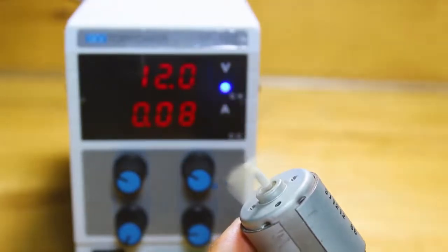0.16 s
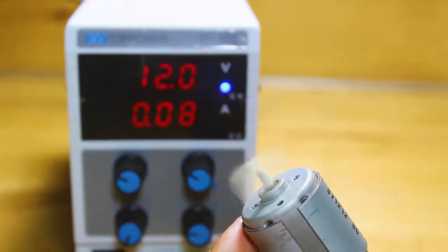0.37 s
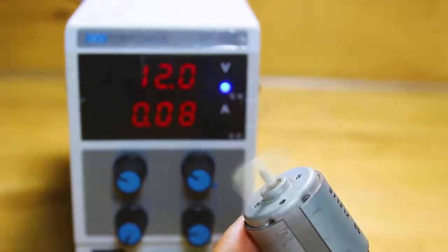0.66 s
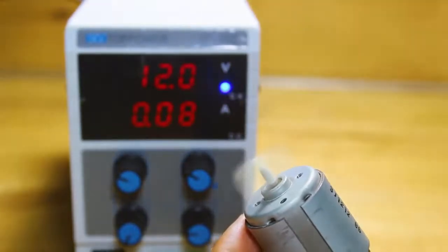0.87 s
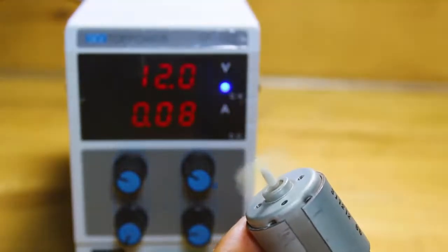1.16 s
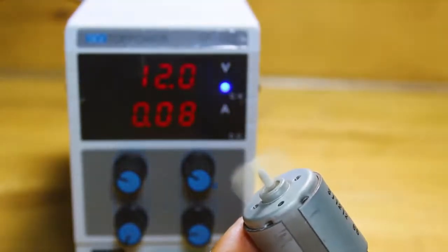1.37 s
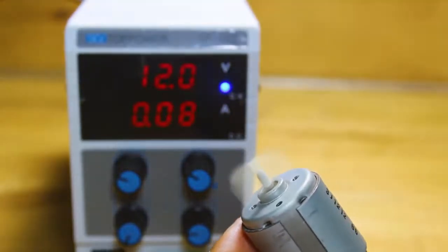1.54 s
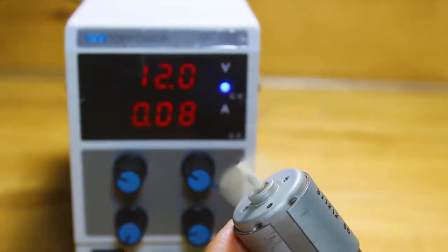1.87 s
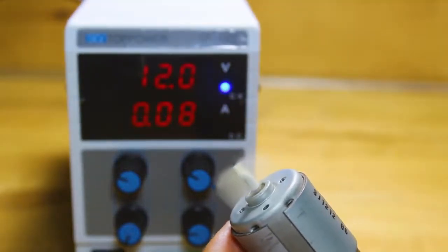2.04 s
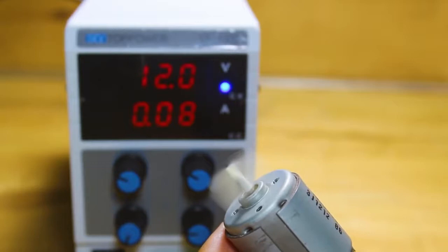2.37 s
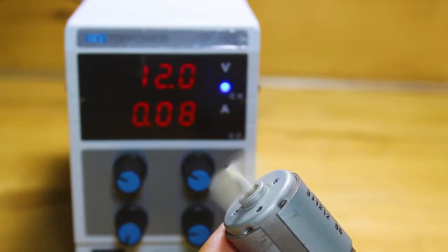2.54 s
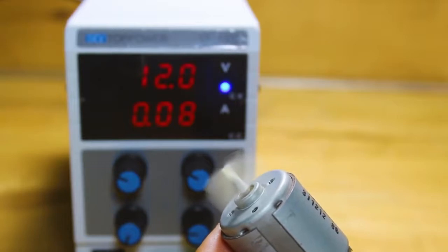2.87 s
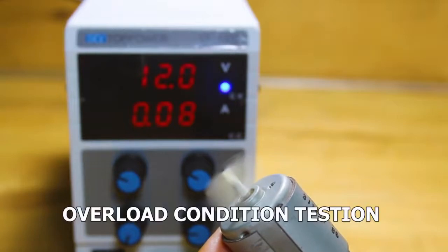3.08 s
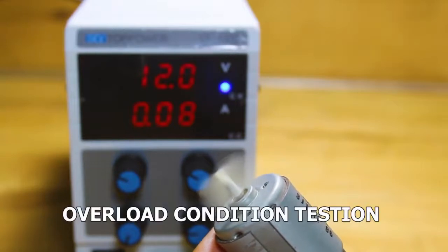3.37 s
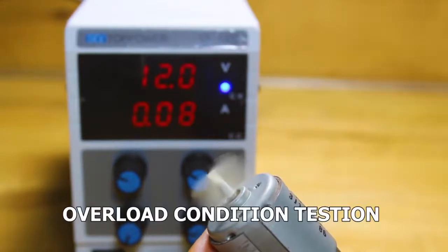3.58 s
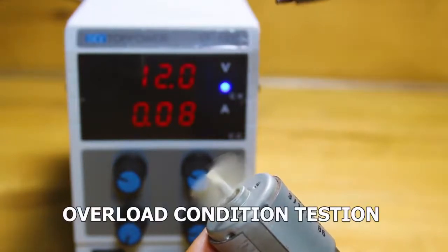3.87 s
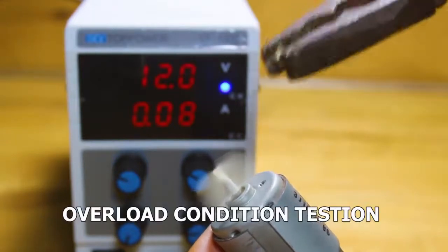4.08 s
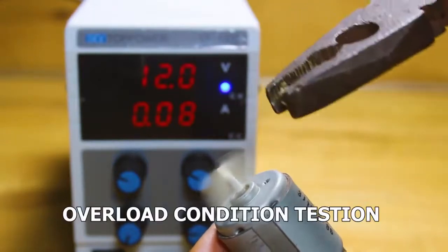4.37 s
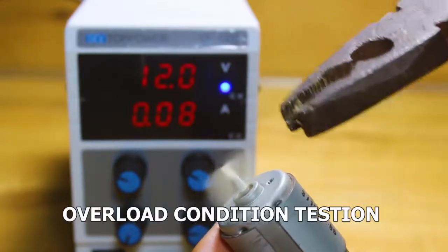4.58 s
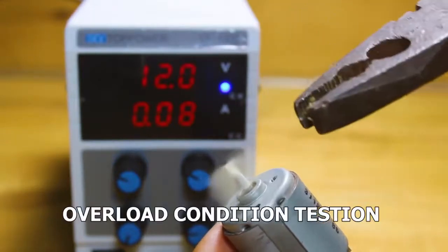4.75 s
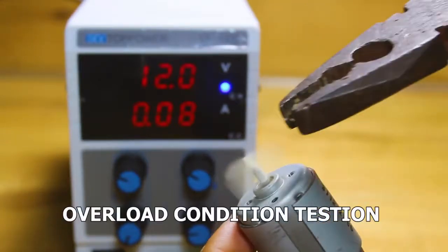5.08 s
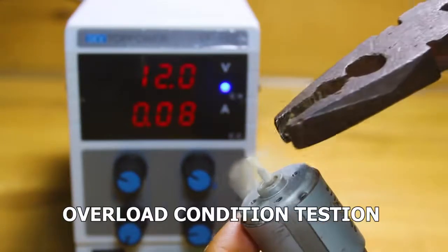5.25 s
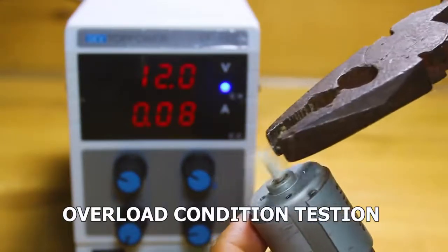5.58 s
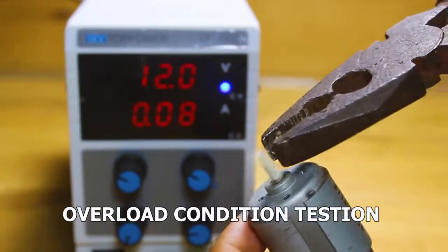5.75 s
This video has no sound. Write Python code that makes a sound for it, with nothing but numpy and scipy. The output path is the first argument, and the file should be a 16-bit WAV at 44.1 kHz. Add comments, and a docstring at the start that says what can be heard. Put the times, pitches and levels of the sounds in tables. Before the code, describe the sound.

Close stereo sound of a tiny motor running at constant speed beside a faintly humming bench supply in a quiet indoor spot. The low hum leans left, with thin, bright brush hiss on top. At about three seconds the level jumps up. In the last half second the strip puffs air and flutters rapidly against pliers, droning roughly while the motor slows very slightly.

```python
"""From the start a hand-held brushed motor spins a paper strip at a steady 67 turns/s, beside a humming bench supply.
The rotor hums, the strip stirs the air; brushes scrape one track every turn and make the steel can sizzle.
At 3 s the whole sound steps up abruptly; the rotor gains a shade of speed and the buzz dips briefly.
At 5.4 s pliers touch the strip: it puffs air, slaps them once a turn, flutters and drones, and slows the rotor."""
import sys
import numpy as np
from scipy import signal
from scipy.fft import rfft, irfft
from scipy.io import wavfile

SR = 44100
rng = np.random.default_rng(int(sys.argv[2]) if len(sys.argv) > 2 else 0)


def dump_mix(stems):
    """Bounce the given channels to the path in sys.argv[1] as a 16-bit WAV at rate SR."""
    frames = np.atleast_2d(stems).T  # one column per channel
    limited = np.clip(frames, -1, 1)  # hard clip at full scale
    pcm = np.round(limited * 32767).astype(np.int16)
    wavfile.write(sys.argv[1], SR, pcm)


N = 261072
TIME_S = np.arange(N) / SR

# Stereo image: (frequency [Hz], left-right likeness [-1..1])
LIKENESS = [(60, .1), (300, .15), (380, .05), (520, .65), (830, .65), (1080, .97), (1500, 1), (5400, 1),
            (6100, .3), (6800, .6), (9500, .35), (11200, .8), (15000, .8)]
# Stereo image: (frequency [Hz], phase by which the left leads [rad])
LEFT_LEAD = [(5600, 0), (6120, -1.5), (6630, 0), (7400, 0), (7840, -.9), (8270, -1), (8550, .6), (8900, .8),
             (9400, 2.8), (10200, 3), (10600, 1.9), (11500, 2.1), (11900, 1.3), (12700, .9), (13400, 2.8),
             (15200, 3.1)]
# Air stirred by the strip: (frequency [Hz], density [dB per Hz], left minus right [dB])
AIR_SPECTRUM = [(25, -78, -1.0), (50, -73.5, -2), (100, -74, 1), (177, -74.5, -3), (222, -76.5, -1.0),
                (300, -70, -1), (393, -73.5, -2), (520, -69, -4), (652, -75, -4.5), (790, -82.5, -12),
                (1370, -100, -0.5)]
# Bench supply's mains hum and fan: (frequency [Hz], level [dB], left minus right [dB])
SUPPLY_TONES = [(99.8, -63, 2), (184.6, -59, 0)]
# Where the brushes bite within a turn: (angle [turns], width [turns], bump over the smooth track [dB])
CONTACTS = [(.06, 0.024, -0.5), (.17, 0.012, -2), (.3, .022, -4.5), (.36, .018, -4.5), (0.534, .022, -0.5),
            (0.596, 0.023, -8), (.69, 0.016, -10), (.87, 0.032, -11)]
# Multiples of rotor speed that stand out, before gains: (multiple, level [dB], left minus right [dB])
STRONG_ORDERS = [(2, -60.0, -10.0), (5, -54.0, 7.0), (6, -58, 4), (10, -55, 1), (11, -60, -14),
                 (15, -49, 0), (16, -52, 0), (17, -51, 0), (18, -57, 0), (21, -57, 0), (24, -59, 0),
                 (27, -61, 0), (28, -46.5, 0), (29, -57, 0), (32, -61, 0), (33, -61, 0), (37, -65, 0),
                 (41, -65, 0), (51, -56, 0), (52, -57, 0), (56, -54, 0), (57, -52, 0), (58, -49, 0),
                 (59, -50, 0), (60, -52, 0), (63, -51, 0), (66, -53, 0), (71, -52, 0), (72, -53, 0),
                 (73, -51, 0), (74, -48, 0), (77, -52, 0), (79, -53, 0), (81, -49, 0), (86, -53, 0),
                 (89, -53, 0), (91, -48, -8), (95, -56, 6), (101, -52, 1), (112, -48, -5), (114, -48, -4),
                 (117, -42, -12), (118, -38, -9), (120, -40, -4), (121, -41, -14), (126, -39, -6),
                 (131, -40, 0), (149, -49, 0), (157, -41, 0), (161, -38, 8), (163, -40, 3), (167, -37, 1),
                 (176, -38, 1), (177, -38, -2), (184, -32, -4), (187, -35, -4), (193, -35, -3),
                 (194, -33, -8)]
# All other multiples, before scatter and gains: (frequency [Hz], level [dB], left minus right [dB])
BUZZ_SPECTRUM = [(200, -64.0, 3.0), (850, -66.0, 1.0), (1250, -62.5, 0.0), (2150, -66.0, 0.0),
                 (2400, -73.0, 0.0), (2850, -71.5, 0.0), (3150, -79.0, 0.0), (3800, -58.5, 0.0),
                 (5200, -56.5, 0.0), (6400, -61.5, 0.0), (8200, -48.0, -4.0), (10000, -54.0, -1.0),
                 (11100, -42.0, 4.0), (11500, -47.0, 1.0), (12000, -41.0, -2.0), (12700, -39.0, -6.0),
                 (14200, -58.0, -1.0), (15500, -56.0, 4.0)]
# Brush friction through the can, before gains: (frequency [Hz], density [dB per Hz], left minus right [dB])
HISS_SPECTRUM = [(800, -75.5, -7.5), (1630, -76, 0), (2090, -79, 0), (2400, -83, 0), (3160, -84, 0),
                 (3800, -75.5, 1.5), (5200, -74, -1), (6280, -74, -5.5), (8730, -67, 2), (9240, -71.5, -8),
                 (10100, -66.5, -3), (10900, -58.5, 3), (11700, -66, 2), (12770, -58, -2),
                 (13700, -67.5, -6), (15500, -69, -2)]
# Modes of the can, rung by sparks: (frequency [Hz], t60 [s], relative level [dB], left minus right [dB])
CAN_MODES = [(3890, .013, -4.5, -3), (8160, 0.0028, -9, -4), (10900, 0.0084, 3, 5), (12200, .005, -8, -9),
             (12600, .006, -2, -6)]
# How hard the brushes rub: (time [s], gain [dB])
RUB_GAIN = [(0, -1.5), (1.9, -1.35), (2.9, -1), (3.5, -0.4), (4.6, -0.5), (5.55, -2), (5.69, -3.5),
            (5.92, -2)]
# Runs of slaps, one a turn: (first slap [s], end of run [s], rate [slaps per s])
SLAP_RUNS = [(5.4238, 5.58, 66.95), (5.5882, 5.716, 66.2), (5.7327, 5.919, 66.8)]
# How hard the strip meets the pliers, before scatter: (time [s], level [dB])
SLAP_FORCE = [(5.425, -35), (5.439, -28), (5.454, -22.5), (5.469, -29), (5.483, -20.5), (5.56, -20.5),
              (5.625, -19), (5.66, -22), (5.7, -25.5), (5.73, -24.5), (5.81, -25), (5.853, -26.5),
              (5.868, -23.5), (5.898, -22), (5.913, -17.5)]
# Strip springs back and hits the pliers a second time: (time [s], level [dB])
REBOUNDS = [(5.4718, -23), (5.5021, -23), (5.7175, -27)]
# Resonance of the strip's free end, higher as the pliers shorten it: (time [s], frequency [Hz])
SLAP_PITCH = [(5.44, 1496), (5.52, 1705), (5.62, 1970), (5.68, 2803), (5.84, 3210), (5.92, 2620)]
# Strip's drone under load, before its gain: (multiple of rotor speed, level [dB])
DRONE_ORDERS = [(5, -56), (6, -55), (7, -51), (10, -55), (12, -55), (13, -55), (15, -51), (16, -53),
                (17, -54), (19, -51), (23, -51)]

CUTOFF_HZ = 15720
# everything is softer until the step
STEP_S, STEP_DB = 2.991, -9
# pliers arrive; load comes on
TOUCH_S, LOAD_RISE_S = 5.43, 0.14
# rotor: speed, gain after the step and its time constant, loss under load and its duration
TURNS_PER_S = 67.28
SPEED_GAIN_TURNS_PER_S, SPEED_GAIN_S = .085, .35
SPEED_LOSS_TURNS_PER_S, SPEED_LOSS_S = .92, .31
# unsteady hand: rate, sway of hum and of brushes
SWAY_HZ, SWAY_HUM_DB, SWAY_RUB_DB = 1.9, 0.5, 0.19
HUM_DB, LOAD_HUM_DB, HUM_BEFORE_DB = -36.3, -6.5, 1.7
AIR_BEFORE_DB, AIR_AFTER_DB, LOAD_AIR_DB = 1, -.5, -0.5
# puff as the strip first folds against the pliers: gain and time to peak
PUFF_DB, PUFF_S = 4, .06
# brushes: free-running gains, and what full load adds
BUZZ_DB, HISS_DB, LOAD_BUZZ_DB, LOAD_HISS_DB = 0.96, -0.07, -2, 4
# buzz dip after the step: depth and time to the lowest point
BUZZ_DIP_DB, BUZZ_DIP_S = -1.0, .28
# gain of neighbouring commutator tracks relative to the main one
WANDER_FREE, WANDER_LOADED = 0.32, 1.33
# lopsided strip presses the brushes harder once a turn
THROB_DB, THROB_ANGLE_TURNS = .5, .17
# paper bends differently each time
SLAP_SCATTER_DB, SLAP_JITTER_S = 1.2, .00004
# swing of the paper and sharp crack, relative to the slap
SNAP_DB, CRACK_DB = 7, 5
# power share of the flutter that is the same after every slap
FLUTTER_REPEATS = .6
ECHO_S, ECHO_DB = .0035, -10
DRONE_DB = -5.5


def from_db(db):
    """Decibels to gain."""
    return 10 ** (np.asarray(db) / 20)


def rms_one(x):
    """Scale to unit rms."""
    return x / np.sqrt(np.mean(x ** 2) + 1e-20)


def in_time(rows):
    """Columns of a curve, sample by sample."""
    time_s, *columns = np.transpose(rows)
    return np.array([np.interp(TIME_S, time_s, column) for column in columns])


def at_hz(rows, hz):
    """Columns of a spectrum, read on a log-frequency axis."""
    points_hz, *columns = np.transpose(rows)
    log_hz = np.log(hz + 1e-9)
    return np.array([np.interp(log_hz, np.log(points_hz), column) for column in columns])


def drift(rate_hz):
    """Low-passed noise with unit rms: smooth chance."""
    hz = np.fft.rfftfreq(N, 1 / SR)
    spectrum = rfft(rng.standard_normal(N)) / (1 + (hz / rate_hz) ** 4)
    return rms_one(irfft(spectrum, N))


def swell(start_s, peak_s):
    """Rises from 0 at the start to 1 after peak_s, then dies away."""
    age = np.maximum(TIME_S - start_s, 0) / peak_s
    return (age * np.exp(1 - age)) ** 2


def panned(db, pan_db):
    """Left and right gains with rms level db."""
    sides = from_db(np.multiply.outer([.5, -.5], np.atleast_1d(pan_db)))
    return from_db(db) * sides / np.sqrt(np.mean(sides ** 2, axis=0))


def two_sides(mid, side, hz):
    """Two unrelated spectra become a partly alike left and right."""
    alike = np.clip(at_hz(LIKENESS, hz), -1, 1)
    sign = np.array([[1], [-1]])
    pair = np.sqrt((1 + alike) / 2) * mid + np.sqrt((1 - alike) / 2) * side * sign
    return pair * np.exp(.5j * sign * at_hz(LEFT_LEAD, hz))


def stereo_noise(spectrum, gate, low_hz):
    """Gated noise coloured by a spectrum in dB per Hz, with a steep low edge."""
    hz = np.fft.rfftfreq(N, 1 / SR)
    mid, side = rfft(rng.standard_normal((2, N)) * gate)
    low_edge = hz ** 4 / (hz ** 4 + low_hz ** 4)
    colour = low_edge * panned(*at_hz(spectrum, hz))
    return irfft(two_sides(mid, side, hz) * colour, N) * np.sqrt(SR / 2)


def rotor_turns(wander):
    """Rotor angle in turns: steady, a shade faster after the step, sagging and faltering under load."""
    gained = SPEED_GAIN_TURNS_PER_S * (1 - np.exp(-np.maximum(TIME_S - STEP_S, 0) / SPEED_GAIN_S))
    lost = SPEED_LOSS_TURNS_PER_S * np.clip((TIME_S - TOUCH_S) / SPEED_LOSS_S, 0, 1)
    falter = 0.019 * wander ** 2 * drift(15.0)
    return np.cumsum(TURNS_PER_S + gained - lost + falter) / SR


def rotor_hum(swing, sway, load, before_step):
    """The strip's once-a-turn pressure wave, a sine reaching mainly the left side."""
    level_db = HUM_DB + LOAD_HUM_DB * load + HUM_BEFORE_DB * before_step + SWAY_HUM_DB * sway
    return from_db(level_db) * panned(db=-3.5, pan_db=23.0) * swing


def stirred_air(swing, load, before_step):
    """Turbulence off the strip: low noise pulsing once a turn, with a puff at first touch."""
    level_db = np.where(before_step, AIR_BEFORE_DB, AIR_AFTER_DB) + LOAD_AIR_DB * load
    level_db = level_db + PUFF_DB * swell(TOUCH_S, PUFF_S)
    return from_db(level_db) * stereo_noise(AIR_SPECTRUM, 1 + 0.12 * swing, low_hz=15)


def supply_tones():
    """The bench supply's mains hum and fan as steady sines."""
    return sum(panned(db, pan_db) * np.sqrt(2) * np.sin(2 * np.pi * hz * TIME_S)
               for hz, db, pan_db in SUPPLY_TONES)


def brush_force(angle_turns):
    """Friction over one turn: a smooth track with a bump at each contact."""
    force = 1
    for centre, width, db in CONTACTS:
        away = (angle_turns - centre + .5) % 1 - .5
        force = force + from_db(db) * np.exp(-.5 * (away / width) ** 2)
    return rms_one(force)


def one_turn(scatter_db, low_hz, size=8192, count=233):
    """The commutator's roughness over one turn, coloured by the can: a stereo cycle."""
    hz = np.arange(1, count + 1) * TURNS_PER_S
    track = rng.standard_normal((2, size)) * brush_force(np.arange(size) / size)
    lines = two_sides(*rfft(track)[:, 1:count + 1], hz)
    db, pan_db = at_hz(BUZZ_SPECTRUM, hz)
    db = db + scatter_db * rng.standard_normal(count)
    multiple, strong_db, strong_pan_db = np.transpose(STRONG_ORDERS)
    strong = multiple.astype(int) - 1
    db[strong], pan_db[strong] = strong_db, strong_pan_db
    # keep the phases, impose the levels
    lines = lines / np.abs(lines) * panned(db, pan_db) * hz / (hz + low_hz)
    return irfft(np.pad(lines, ((0, 0), (1, 0))), size) * size / np.sqrt(2)


def play(cycle, turns):
    """Read a cycle round and round at the rotor's angle."""
    angles = np.arange(cycle.shape[1]) / cycle.shape[1]
    return np.array([np.interp(turns % 1, angles, side) for side in cycle])


def brush_buzz(turns, wander, count=3):
    """One track is scraped each turn; as the brushes shift, neighbouring tracks fade in and out."""
    main = play(one_turn(scatter_db=3.2, low_hz=0), turns)
    others = sum(drift(3.5) * play(one_turn(scatter_db=1.0, low_hz=1500), turns) for _ in range(count))
    return (main + wander * others / np.sqrt(count)) / np.sqrt(1 + wander ** 2)


def brush_hiss(turns, flicker_db):
    """The part of the friction that never repeats, pulsing with the contacts."""
    gate = rms_one(brush_force(turns) * from_db(flicker_db * drift(100)))
    return stereo_noise(HISS_SPECTRUM, gate, low_hz=670)


def sparks(turns, spread_db, level_db):
    """Each contact breaks with a tiny spark of chance strength that rings the can's modes."""
    clicks, out = np.zeros(N), 0
    whole_turns = np.arange(int(turns[-1]) - 1)
    for centre, width, db in CONTACTS:
        slip, strength = rng.standard_normal((len(whole_turns), 2)).T
        at = np.searchsorted(turns, whole_turns + centre + .5 * width * slip)
        spark_db = level_db + db + spread_db * np.minimum(strength, 2)
        clicks[np.minimum(at, N - 1)] = from_db(spark_db)
    for hz, t60_s, db, pan_db in CAN_MODES:
        radius = from_db(-60 / (t60_s * SR))
        step_rad = 2 * np.pi * hz / SR
        poles = [1, -2 * radius * np.cos(step_rad), radius * radius]
        ring = signal.lfilter([.5, 0, -.5], poles, clicks + 1e-18)
        out = out + panned(db, pan_db) * ring
    return out


def brushes(turns, wander, sway, load):
    """Buzz, hiss and sparks share the brush pressure, which throbs once a turn and sways with the hand."""
    buzz_db = BUZZ_DB + LOAD_BUZZ_DB * load + BUZZ_DIP_DB * swell(STEP_S, BUZZ_DIP_S)
    buzz = from_db(buzz_db) * brush_buzz(turns, wander)
    hiss = from_db(HISS_DB + LOAD_HISS_DB * load) * brush_hiss(turns, flicker_db=1.0)
    sizzle = sparks(turns, spread_db=7.0, level_db=-41.5)
    throb_db = THROB_DB * np.cos(2 * np.pi * (turns - THROB_ANGLE_TURNS))
    rub_db = in_time(RUB_GAIN) + SWAY_RUB_DB * sway + throb_db
    return from_db(rub_db) * (buzz + hiss + sizzle)


def slap_events():
    """One strike a turn, as hard as the pliers are held in the way, plus rebounds: (s, dB) per slap."""
    times = np.concatenate([np.arange(first, end, 1 / rate) for first, end, rate in SLAP_RUNS])
    late, harder = rng.standard_normal((len(times), 2)).T
    levels = np.interp(times, *np.transpose(SLAP_FORCE)) + SLAP_SCATTER_DB * harder
    return sorted([*zip(times + SLAP_JITTER_S * late, levels), *map(tuple, REBOUNDS)])


def die_away(hits, t60_s):
    """Exponential decay from every hit."""
    return signal.lfilter([1], [1, -from_db(-60 / (t60_s * SR))], hits + 1e-18)


def band_noise(noise, low_hz, high_hz):
    """Band-passed noise of unit rms."""
    band = signal.butter(2, [low_hz, high_hz], "band", fs=SR, output="sos")
    return rms_one(signal.sosfilt(band, noise))


def slaps(crack_hz, flutter_db, ring_db, ring_width_hz, flutter_t60_s, crinkle_db, low_hz, high_hz):
    """A sharp crack and one short swing of the paper, then a flutter that partly repeats from slap to slap."""
    pitch_hz, = in_time(SLAP_PITCH)
    snap, hits, age = np.zeros(N), np.zeros(N), np.arange(N)
    for s, db in slap_events():
        at = min(round(s * SR), N - 1)
        near = slice(at - SR // 500, at + SR // 500)
        for hz, part_db in (pitch_hz[at], SNAP_DB), (crack_hz, CRACK_DB):
            swing_rad = 2 * np.pi * hz * (TIME_S[near] - s)
            snap[near] -= from_db(db + part_db) * swing_rad * np.exp(-swing_rad ** 2 / 2)
        hits[at] = from_db(db)
        age[at:] = np.arange(N - at)  # samples since the last slap
    same, fresh = np.sqrt([FLUTTER_REPEATS, 1 - FLUTTER_REPEATS])

    rough_noise = rng.standard_normal(N) * from_db(crinkle_db * drift(600))
    crinkles = band_noise(rough_noise, low_hz, high_hz)
    crinkles = same * crinkles[age] + fresh * crinkles

    phase = 2 * np.pi * np.cumsum(pitch_hz) / SR
    fresh_ring = drift(ring_width_hz) * np.cos(phase) + drift(ring_width_hz) * np.sin(phase)
    same_ring = drift(ring_width_hz)[age] * np.sqrt(2) * np.sin(2 * np.pi * pitch_hz * age / SR)
    # a shorter free end rings less
    ring = (same * same_ring + fresh * fresh_ring) * pitch_hz[0] / pitch_hz

    flutter = from_db(flutter_db) * crinkles + from_db(ring_db) * ring
    return snap + die_away(hits, flutter_t60_s) * flutter


def bench_echo(x):
    """The bench throws the sound back a moment later."""
    return x + from_db(ECHO_DB) * np.interp(TIME_S - ECHO_S, TIME_S, x)


def slap_air(level_db, t60_s, low_hz, high_hz):
    """Each slap shoves a dull gust of air, different at the two sides."""
    hits = np.zeros(N)
    for s, db in slap_events():
        hits[min(round(s * SR), N - 1)] = from_db(db + level_db)
    return die_away(hits, t60_s) * band_noise(rng.standard_normal((2, N)), low_hz, high_hz)


def strip_drone(turns, waver_hz, waver_db):
    """Held back every turn, the strip drones on low rotor multiples that swell and fade as it bends."""
    drone = 0
    for multiple, db in DRONE_ORDERS:
        tone = np.sqrt(2) * np.sin(2 * np.pi * (multiple * turns + rng.random()))
        drone = drone + from_db(db + waver_db * drift(waver_hz)) * tone
    return drone


def scene():
    """Hum, air and brush noise follow one rotor and the load the pliers put on it."""
    load = np.clip((TIME_S - TOUCH_S) / LOAD_RISE_S, 0, 1)
    wander = WANDER_FREE + (WANDER_LOADED - WANDER_FREE) * load
    turns = rotor_turns(wander)
    swing = np.sin(2 * np.pi * turns)
    sway = drift(SWAY_HZ)
    before_step = TIME_S < STEP_S

    motor = rotor_hum(swing, sway, load, before_step) + stirred_air(swing, load, before_step)
    motor = motor + supply_tones() + brushes(turns, wander, sway, load)
    paper = slaps(crack_hz=5200, flutter_db=-15.0, ring_db=-20.0, ring_width_hz=380,
                  flutter_t60_s=0.097, crinkle_db=2.0, low_hz=1160, high_hz=4600)
    gusts = slap_air(level_db=-22, t60_s=.06, low_hz=310, high_hz=1000)
    drone = load * from_db(DRONE_DB) * strip_drone(turns, waver_hz=7.9, waver_db=2.5)
    return from_db(STEP_DB * before_step) * motor + bench_echo(paper) + gusts + drone


def record(dry):
    """Cut the top steeply with a linear-phase low-pass."""
    low_pass = signal.firwin(801, CUTOFF_HZ, window=("kaiser", 9), fs=SR)
    return signal.fftconvolve(dry, low_pass[None], "same")


dry = scene()
out = record(dry)
dump_mix(out)
```